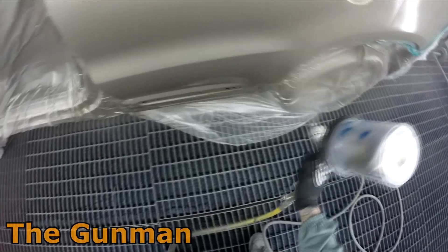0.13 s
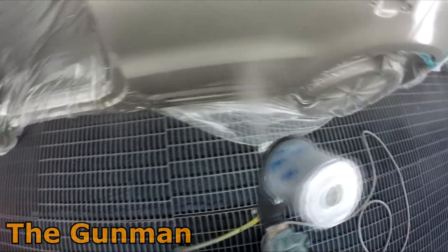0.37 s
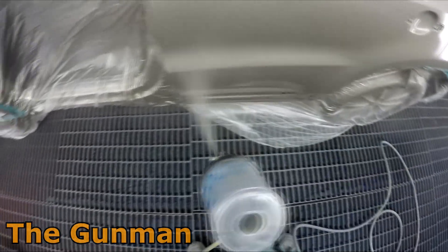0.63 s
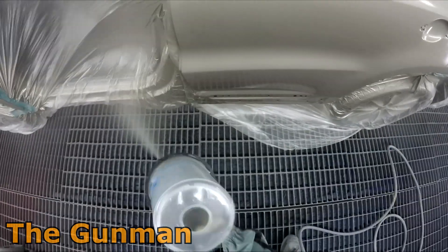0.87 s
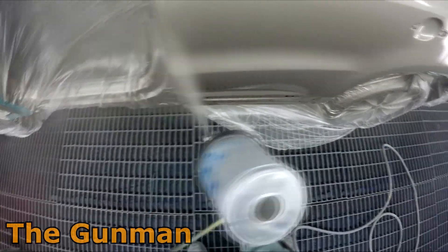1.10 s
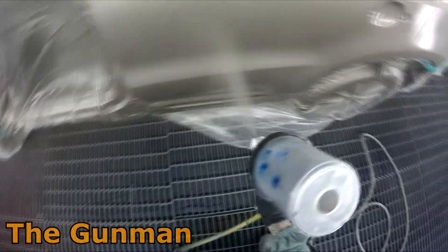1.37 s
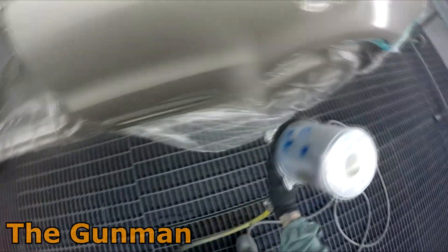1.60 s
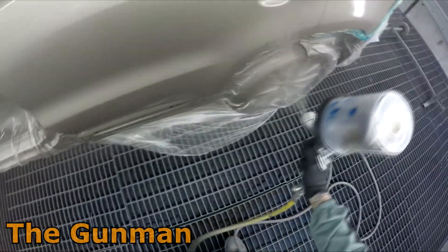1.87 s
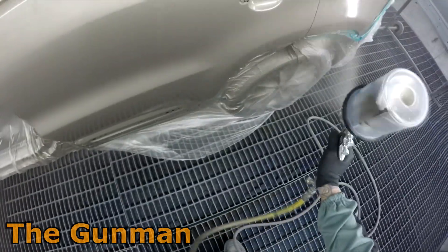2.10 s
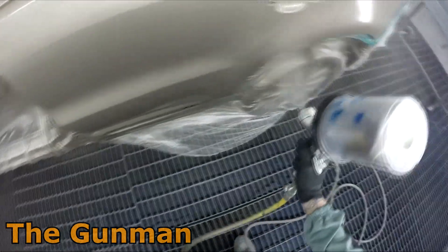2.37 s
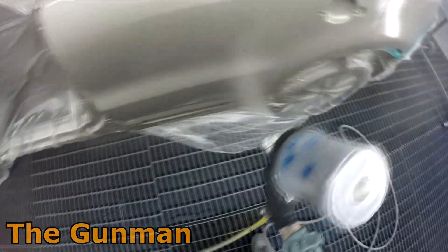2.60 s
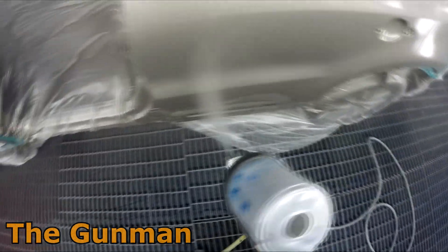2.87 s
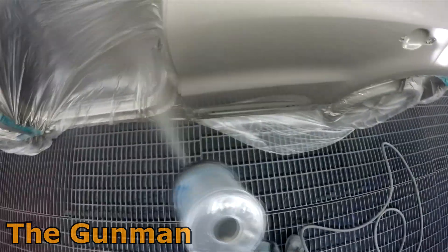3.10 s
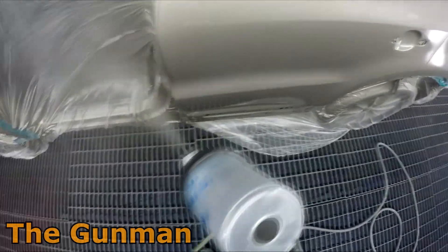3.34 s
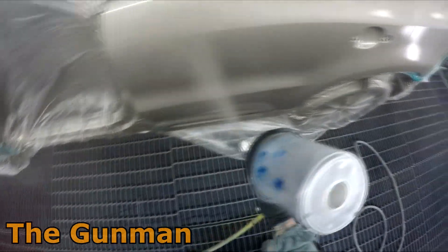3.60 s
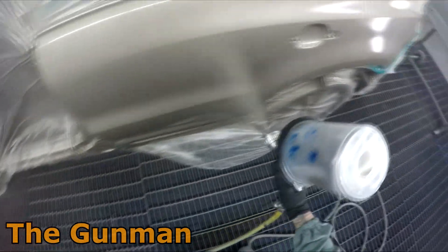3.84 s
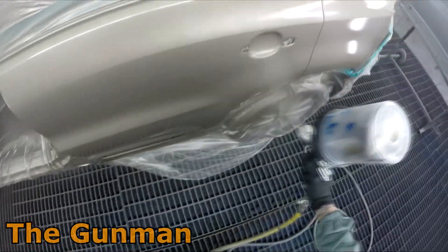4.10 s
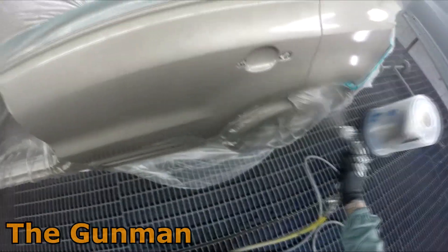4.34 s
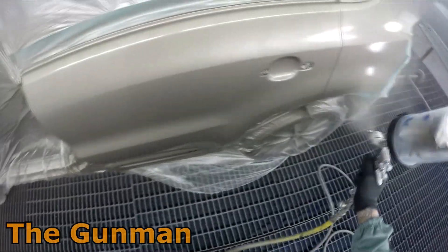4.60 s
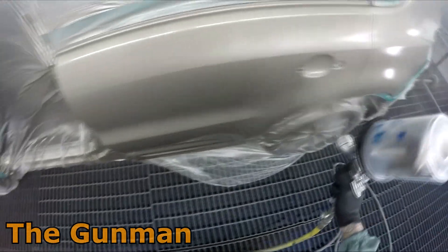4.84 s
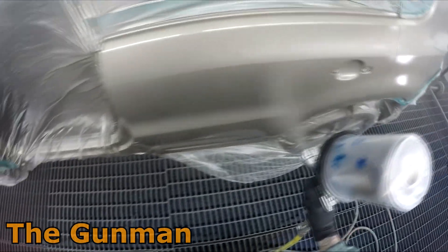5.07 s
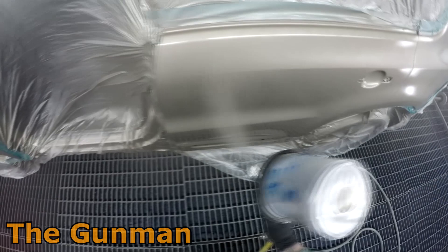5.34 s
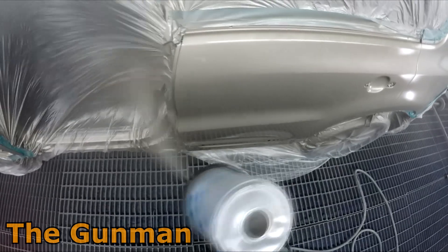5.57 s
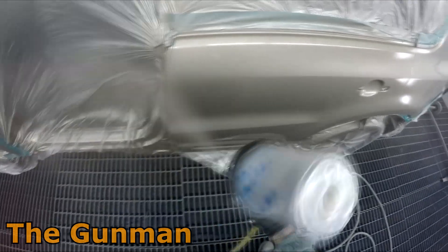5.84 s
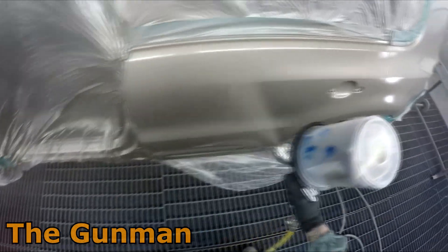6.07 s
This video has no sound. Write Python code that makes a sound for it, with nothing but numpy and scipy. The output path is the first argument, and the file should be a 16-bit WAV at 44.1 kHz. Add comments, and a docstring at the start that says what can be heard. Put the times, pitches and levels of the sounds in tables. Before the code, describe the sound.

Steady compressed-air hiss sweeps slowly brighter and duller as a spray gun moves to and fro, with booth ventilation humming and gusting low underneath.

```python
"""A paint spray gun sweeps to and fro along a car side in a spray booth: its air jet is a broadband hiss,
noise filtered by the resonances of a closed case. Most of its treble rises toward the ends of each stroke
and dips briefly at the turn itself. Under it the booth fan hums, sines on orders of its shaft over a duct roar,
and the downdraught rumbles as low noise in gusts. One microphone in the case hears it all."""
import sys
import numpy as np
from scipy import signal
from scipy.fft import rfft, irfft, next_fast_len
from scipy.io import wavfile
from scipy.ndimage import uniform_filter1d

SR = 44100
rng = np.random.default_rng(int(sys.argv[2]) if len(sys.argv) > 2 else 0)


def dump_mix(stems):
    """Bounce the given channels to the path in sys.argv[1] as a 16-bit WAV at rate SR."""
    frames = np.atleast_2d(stems).T  # one column per channel
    limited = np.clip(frames, -1, 1)  # hard clip at full scale
    pcm = np.round(limited * 32767).astype(np.int16)
    wavfile.write(sys.argv[1], SR, pcm)


def volts(x):
    """Linear amplitude factor 10**(x/20) for a level x in dB, scalar or array-like."""
    e = np.asarray(x, float) / 20
    return 10 ** e


N = 273596  # length in samples
SPAN = next_fast_len(N)  # transform length
HZ = np.arange(SPAN // 2 + 1) * SR / SPAN

# broad colour of the jet, relative density: frequency_hz, density_db
JET_COLOUR = [(300, -25.5), (700, -30.5), (1100, -23), (2000, -11), (3000, -8.5), (3900, -5.5), (4300, -13),
              (6000, -15.5), (9000, -15.5), (15000, -19.5)]
# resonances (+) and cancellations (-) of the case: centre_hz, width_hz, gain_db
CASE_RESONANCES = [(1215, 192, 9.5), (1395, 67, -15.5), (1790, 70, -4), (2010, 98, 1.5), (2428, 36, 6.5),
                   (2647, 73, 5.5), (2860, 102, -7), (3166, 70, -2.5), (3218, 59, 8), (3524, 376, 4),
                   (3863, 236, 5), (4116, 52, -13.5), (4190, 90, 2.5), (4380, 92, -9), (4610, 320, 4),
                   (4920, 180, 4), (5230, 210, -4.5), (5360, 200, 9), (5870, 300, -1.5), (6100, 82, 5),
                   (7220, 396, 10), (7900, 270, 2.5), (9500, 150, -4.5), (10600, 1070, 3.5),
                   (11980, 500, -4), (12050, 140, 12.5), (12900, 560, 6.5), (13300, 500, 2),
                   (14540, 450, 6)]
# how each region of the hiss follows the gun, before the bass share:
# centre_hz, gain_to_right_db, gain_at_ends_db, share_of_dip (0-1)
FOLLOW_REGIONS = [(2090.0, -0.9, -0.51, 0.12), (3430, -0.8, -1.8, 0.26), (4950, -1.1, -1.3, 0.45),
                  (6300, 2.2, 3, 0.31), (7100, 0.6, 4.5, 1), (7960, 0.7, -0.3, 0.25),
                  (9030.0, 0.78, 1.63, 0.6), (10400, 2.5, 4.5, 1.0), (11990.0, 1, 3, 0.66),
                  (13130.0, -1.7, 7.5, 0.88), (14480.0, -0.2, 7.5, 0.94)]
# slow drift of the hiss, heard about its mean, before the bass share: time_s, body_db, lower_treble_db, top_db
HISS_DRIFT = [(.18, -1, -2.5, -.8), (.7, -0.5, 1.7, 0.5), (1.15, 0.9, 1.7, 2), (1.55, -1.2, 0, -1),
              (1.93, -0.3, -1.5, -0.3), (2.5, .4, -1, 1.5), (2.92, 0.2, -0.3, 0.5), (3.64, 0, 1.6, 3),
              (3.93, -0.45, -1.8, -.8), (4.94, -0.4, -2, .3), (5.3, -1.1, 2.5, 1), (5.58, 0.2, 3, 5),
              (5.95, -0.5, 5.5, 3), (6.15, 0.5, 5.5, 1)]
# centres of the three drifting bands: centre_hz
DRIFT_CENTRES = [3530, 7650, 13000]


def jet(patchy_db=1.5, flutter_db=0.39, step_hz=297.3):
    """Turbulence noise through resonances; each slice follows the gun and drifts as panel echoes shift."""
    place, dip_db = sweep()
    controls = np.array([place, place ** 2, dip_db, *curves(HISS_DRIFT)])
    controls = controls - controls.mean(axis=1, keepdims=True)
    colour_db = shape_db(JET_COLOUR)
    for centre_hz, width_hz, gain_db in CASE_RESONANCES:
        colour_db = colour_db + gain_db / (1 + (2 * (HZ - centre_hz) / width_hz) ** 2)
    air = noise(colour_db)
    jet_db = -38  # rms between 3 and 5.6 kHz, before the motion
    air = air * volts(jet_db) / np.std(sound(air * (HZ > 3000) * (HZ < 5600)))

    region_hz, *follow = np.transpose(FOLLOW_REGIONS)
    flutter = flutter_db * walk(18)  # the fan of spray wavers as a whole
    bass_follow = 0.44  # share of the sweep and drift still felt at the bottom of the hiss
    hiss = 0
    for hz in np.arange(0, 16000, step_hz):
        shares = [np.interp(hz, region_hz, column) for column in follow]
        shares += [np.interp(hz, DRIFT_CENTRES, band) for band in np.eye(len(DRIFT_CENTRES))]
        motion_db = shares @ controls * np.interp(hz, [600, 1800], [bass_follow, 1])
        # overlapping triangular bands add up to the whole spectrum
        band = np.clip(1 - abs(HZ - hz) / step_hz, 0, 1)
        gain_db = motion_db + flutter + patchy_db * walk(3.686)
        hiss = hiss + volts(gain_db) * sound(air * band)
    return hiss


# ends of the strokes, left and right in turn, where the wrist flicks the nozzle away:
# time_s, dip_db (before each region's share), half_width_s (standard deviation of the dip)
STROKE_TURNS = [(0.94, -7, 0.079), (2.15, -8, 0.12), (3.25, -5.5, 0.08), (4.55, -9, 0.18), (5.71, -8, 0.12)]
# the gun passes the middle of the panel: time_s
MID_STROKES = [.63, 1.51, 2.93, 3.82, 5.25, 6.3]


def sweep():
    """Sinusoidal motion: place of the gun (-1 left, 1 right), slowing into every turn, and the turn dips."""
    t = np.arange(N) / SR
    first_turn_s, last_turn_s = -0.18, 6.8
    turn_times = [time_s for time_s, _, _ in STROKE_TURNS]
    marks = np.sort([first_turn_s, last_turn_s, *MID_STROKES, *turn_times])
    quarter_cycles = np.interp(t, marks, np.arange(len(marks)))
    place = np.cos(np.pi / 2 * quarter_cycles)
    dip_db = sum(db * np.exp(-.5 * ((t - s) / w) ** 2) for s, db, w in STROKE_TURNS)
    return place, dip_db


# colour of the duct roar, relative density: frequency_hz, density_db
DUCT_COLOUR = [(32, -27), (55, -3), (85, -7), (105, -3.5), (150, -7), (235, -12), (275, -20), (312, -14.5),
               (350, -21), (443, -25.5), (604, -31), (950, -33.5), (1240, -64), (2090, -120)]
# orders of the shaft that are heard: multiple of the shaft rate
SHAFT_ORDERS = [4, 5, 10, 25]
# one row per order: level_db (rms), unsteadiness (0-1)
ORDER_LEVELS = [(-56.5, 0.41), (-50.5, 0.2), (-66, 0.86), (-75.5, 0.25)]


def fan(drift=.0015, waver_db=5.):
    """Rotating-source tones: orders sharing one slight drift of the motor speed, over even broadband roar."""
    shaft_hz, roar_db = 32.76, -46
    roar = level(sound(noise(shape_db(DUCT_COLOUR))), roar_db)
    turn = 2 * np.pi * np.cumsum(shaft_hz * (1 + drift * walk(2.47))) / SR
    tones = 0
    for order, (level_db, unsteady) in zip(SHAFT_ORDERS, ORDER_LEVELS):
        # eddies on the blades shake the strength and phase of each order
        strength = volts(waver_db * unsteady * walk(6))
        phase = order * turn + np.pi * unsteady * walk(8)
        tones = tones + level(strength * np.sin(phase), level_db)
    return roar + tones


# colour of the rumble, relative density: frequency_hz, density_db
DRAUGHT_COLOUR = [(4.7, -38), (8.0, -3), (27, -0.5), (60, -6), (78, -24), (130, -120)]
# downdraught, before the random gusting: time_s, level_db
GUST_LEVELS = [(.1, -46.5), (.4, -43), (.8, -42), (1.1, -47.5), (1.7, -40.5), (2.1, -45), (3, -45),
               (3.4, -42), (3.6, -48), (4.2, -39), (5.2, -41), (5.6, -46), (6.15, -43.5)]


def draught(gusty_db=1.5):
    """Flow-induced rumble: air moving past the case shakes it in slow gusts."""
    rumble = level(sound(noise(shape_db(DRAUGHT_COLOUR))), 0)
    return rumble * volts(curves(GUST_LEVELS)[0] + gusty_db * walk(6.7))


def noise(db):
    """Spectral shaping: spectrum of white noise weighted by the given colour."""
    return rfft(rng.standard_normal(SPAN)) * volts(db)


def shape_db(points):
    """Spectral envelope: points joined on a log-frequency axis."""
    hz, db = np.transpose(points)
    return np.interp(np.log(HZ + 1), np.log(hz), db)


def sound(spectrum):
    """Fourier synthesis: from spectrum back to samples."""
    return irfft(spectrum, SPAN)[..., :N]


def level(x, db):
    """Root-mean-square scaling to a level in dB."""
    return x * volts(db) / np.sqrt(np.mean(x ** 2))


def curves(table):
    """Linear interpolation: columns of a table as sample-wise curves."""
    time_s, *columns = np.transpose(table)
    return np.array([np.interp(np.arange(N) / SR, time_s, column) for column in columns])


def walk(rate):
    """Low-pass random modulation: levels held 1 / rate s and smoothed twice; standard deviation 1."""
    hold = int(SR / rate)
    steps = np.repeat(rng.standard_normal(N // hold + 1), hold)
    smooth = uniform_filter1d(uniform_filter1d(steps, hold), hold)[:N]
    return smooth / smooth.std()


def scene():
    """Superposition: all sources add at one microphone, given alike to both channels."""
    return np.tile(jet() + fan() + draught(), (2, 1))


def roll_off(x):
    """The treble ends steeply here."""
    return signal.sosfilt(signal.butter(12, 16460, fs=SR, output="sos"), x)


def record(dry):
    """Band limiting: sound fades in after a short silence and the top is cut sharply."""
    start_s, fade_s = .0785, 0.0057
    top_hz, top_slope_hz = 15350, 100  # silent above top_hz, full below the slope
    fade = np.clip((np.arange(N) / SR - start_s) / fade_s, 0, 1)
    low_pass = np.clip((top_hz - HZ) / top_slope_hz, 0, 1)
    cut = sound(rfft(dry * fade, SPAN) * low_pass)
    mix = cut * (fade > 0)  # no filter ringing in the opening silence
    return roll_off(mix)


dry = scene()
out = record(dry)
dump_mix(out)
```